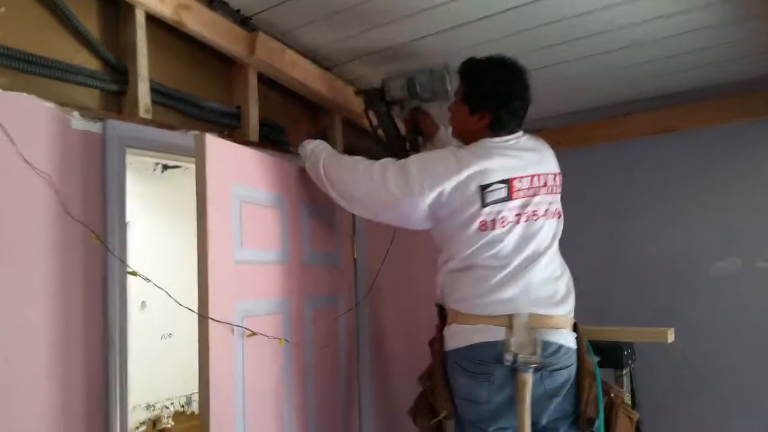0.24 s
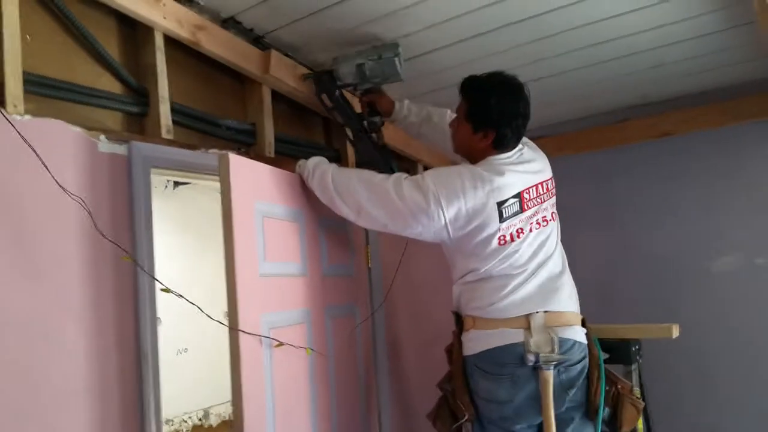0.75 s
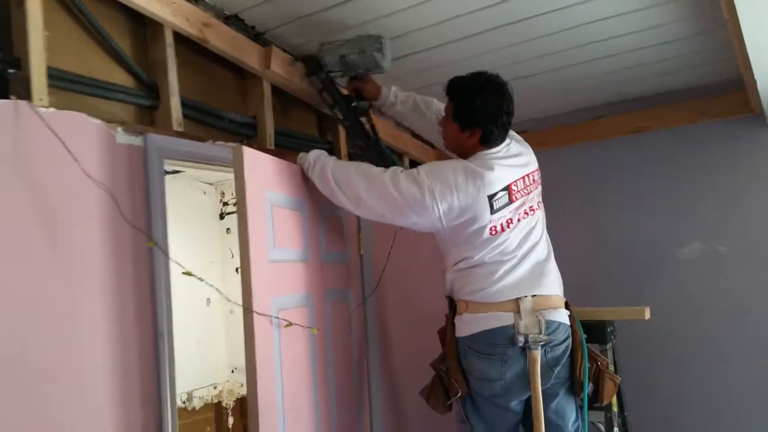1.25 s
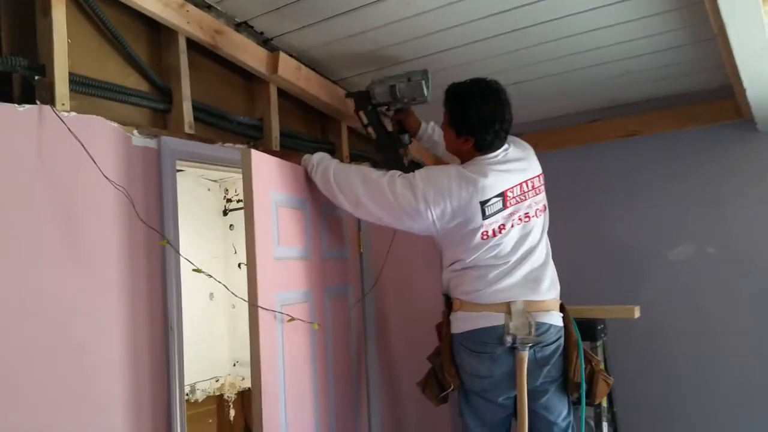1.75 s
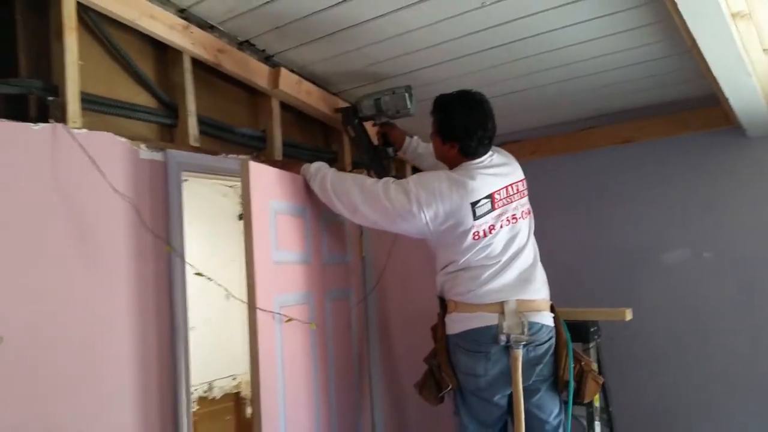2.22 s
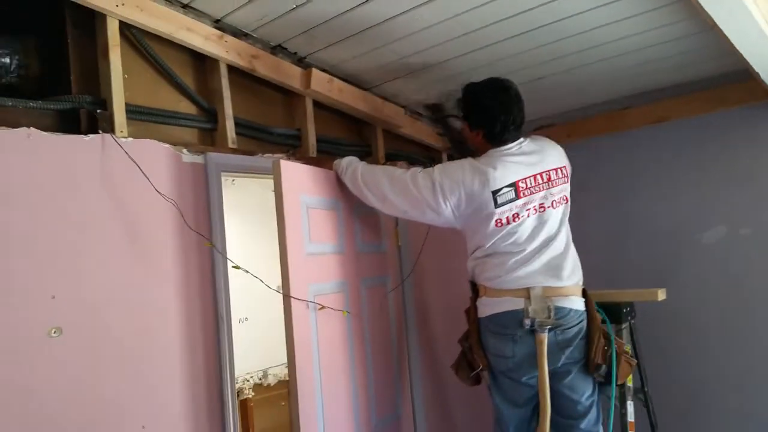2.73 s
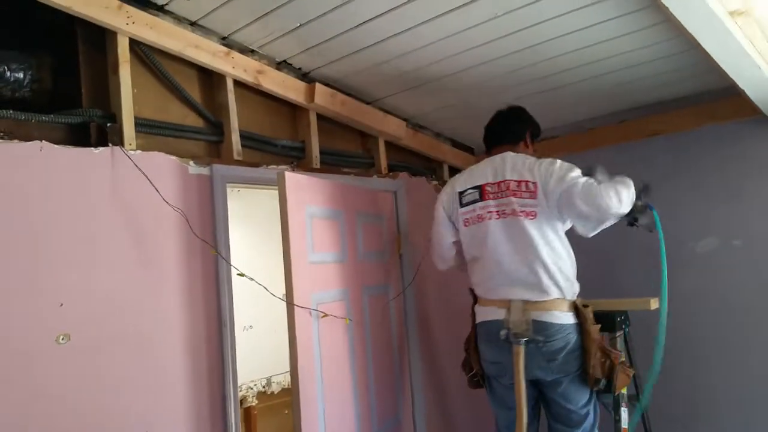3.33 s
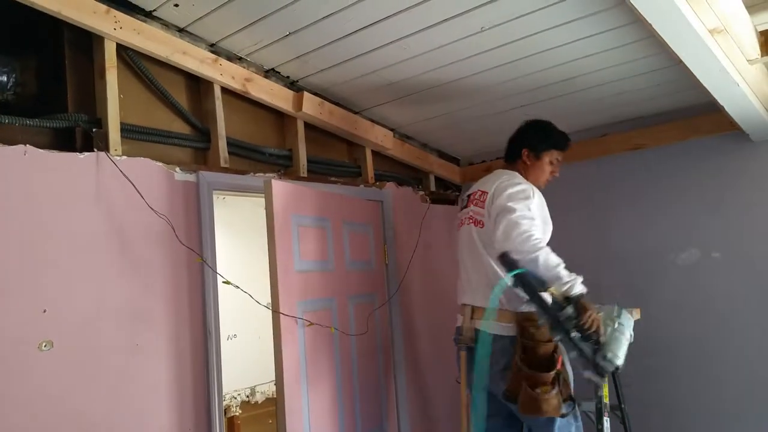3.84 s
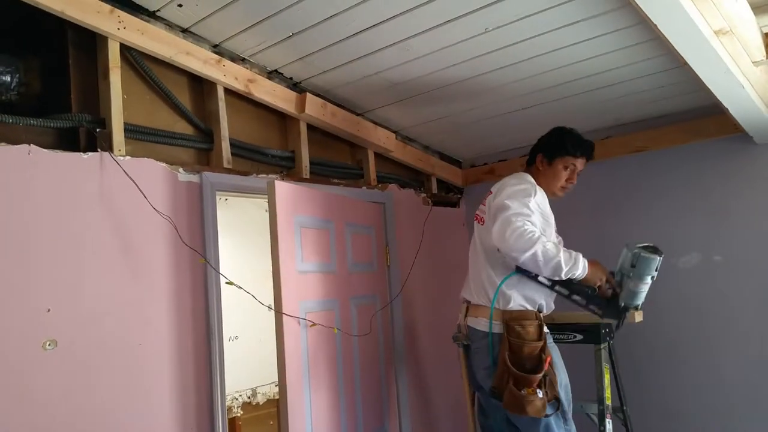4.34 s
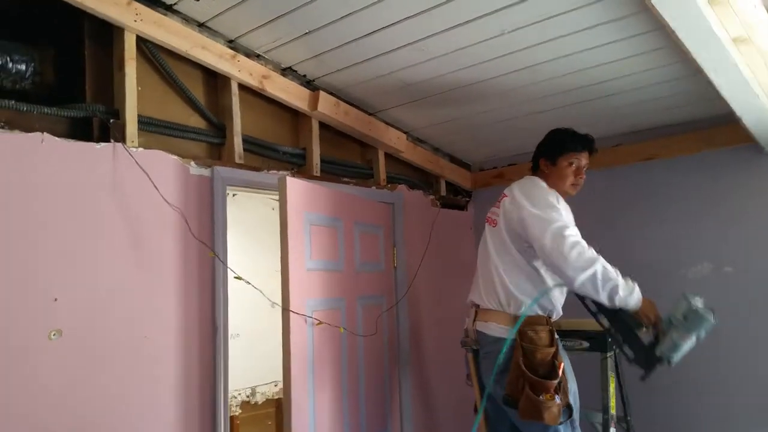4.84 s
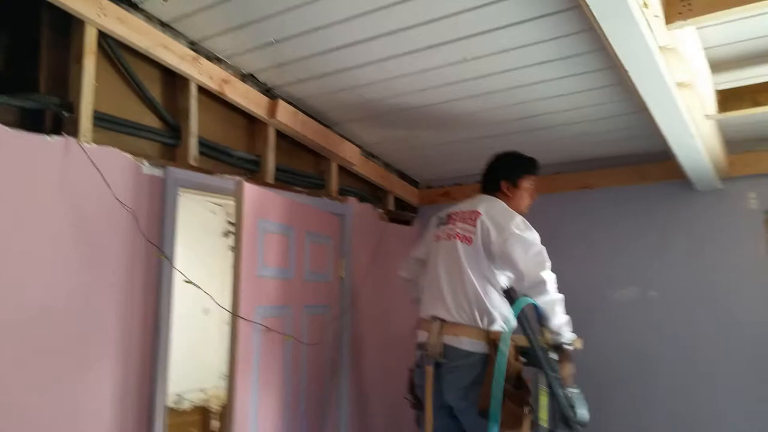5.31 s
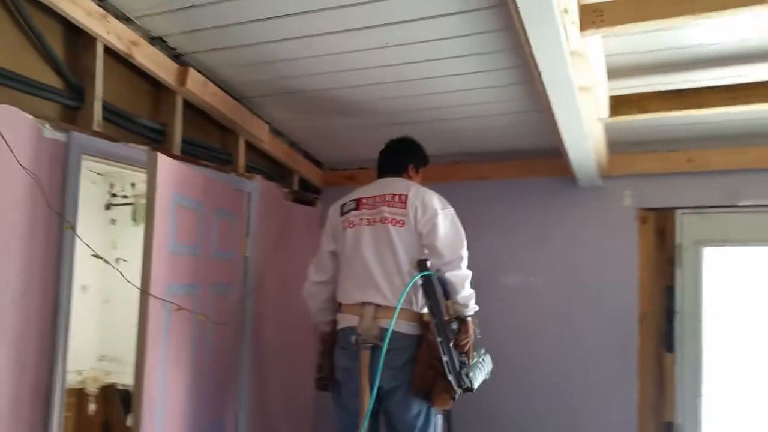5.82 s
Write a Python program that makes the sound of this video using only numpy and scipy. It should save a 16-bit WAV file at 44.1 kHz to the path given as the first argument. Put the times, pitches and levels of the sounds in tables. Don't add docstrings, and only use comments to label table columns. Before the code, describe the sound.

A small piston compressor drones in a bare room while a nail gun fires two sharp, blasting shots, followed by metallic clinks and knocks.

```python
import sys
import numpy as np
from scipy import signal
from scipy.fft import rfft, irfft
from scipy.io import wavfile
from scipy.ndimage import uniform_filter1d

SR = 44100
rng = np.random.default_rng(int(sys.argv[2]) if len(sys.argv) > 2 else 0)


def volts_from_db(level):
    exponent = np.asarray(level, float) / 20
    return 10 ** exponent


def generate_wav(sig):
    pcm = np.round(np.clip(np.atleast_2d(sig).T, -1, 1) * 32767).astype(np.int16)
    wavfile.write(sys.argv[1], SR, pcm)


N = 267687

# treble level/dB, hold/s, fall/(dB/s), bass relative level/dB
BLASTS = [
    (-16, 0.0041, 72, -2),
    (-19.5, 0.043, 75, -3),
    (-17, .006, 59, -13),
    (-19.5, .042, 91, -10.5),
]
# start t/s, cut off t/s
BLAST_SPANS = [
    (1.183, 1.344),
    (1.345, 1.8),
    (2.39, 2.548),
    (2.549, 2.97),
]
# f/Hz, level/(dB per Hz)
BLAST_SPECTRUM = [(18, -50), (30, -48), (49, -8), (152, 2.5), (257, -2), (401, -4.5), (836, -10),
                  (1410, -10), (1570, -10.5), (1840, -8.5), (3020, -14.5), (5660, -9), (8170, -14),
                  (11800, -14), (15700, -15)]
# f/Hz, side minus mid level/dB
BLAST_WIDTH = [(60, -3), (150, -6), (380, -5), (950, 0), (2380, -1), (5980, 0), (15000, 0)]
LIMIT_S = 0.17
TREBLE_DB_PER_S, LOW_DB_PER_S, MIDDLE_DB = 134, 23, -0.03

# t/s, level/dB, f/Hz, t60/s, left minus right level/dB
CLINKS = [(1.01, -39, 10700, 0.17, -8), (1.148, -12, 2520, 0.041, 11), (1.148, -21, 3460, 0.063, 14),
          (1.148, -19, 5500, 0.055, 0.), (2.356, -30, 3450, .08, 0.), (2.386, -1, 10400, 0.016, 0.),
          (2.446, -18.5, 1776, 0.13, -13), (3.949, -9, 3270, 0.092, -9), (3.98, -19.5, 3310, .18, 9),
          (4.064, -5, 820, .06, 3), (4.069, -18, 2580, .11, -2), (4.968, -14.5, 1736, .12, -10),
          (4.972, -15, 1990, 0.13, -2), (5.013, -23, 1890, 0.36, 1), (5.171, -45, 5920, .3, 0.),
          (5.21, -43, 1358, 1.7, 0.), (5.652, -40, 11600, .3, 9)]
# t/s, level/dB, f/Hz, t60/s, left minus right level/dB
THUDS = [
    (1.183, -24, 86.5, 0.13, 4),
    (1.599, -30, 140, 0.56, 4),
    (2.63, -45, 55.6, .55, -9),
    (2.7, -37, 132, 0.56, 0.),
]
# level/dB, f/Hz, t60/s, left minus right level/dB
SQUEAK = (-9.5, 1195, .085, 4)
SQUEAK_S, SLIP_S = 4.066, 0.022
GLIDE = 0.022

# t/s, level/dB, centre f/Hz, t60/s
TAPS = [(1.07, -28, 7960, 0.15), (1.146, -22.5, 4500, 0.12), (1.185, -10, 2180, 0.039),
        (1.346, -26, 3000, .09), (2.331, -37.5, 7500, .9), (2.354, -26.5, 3940, 0.14),
        (2.551, -10, 1290, .12), (3.899, -25, 3200, 0.11), (4.966, -18, 6940, 0.36),
        (4.968, -21, 10300, 0.081), (5.485, -27.5, 4870, 0.066), (5.651, -34, 6000, 0.13)]
# t/s, level/dB, centre f/Hz, t60/s
RUSTLES = [
    (.94, -39, 8000, 4.5),
    (3.09, -42, 5000, 0.37),
    (4.7, -32, 9000, .51),
    (4.74, -34, 8900, 0.33),
    (4.87, -32, 11000, 0.4),
    (4.909, -26, 8900, .2),
    (4.955, -24, 7500, 0.23),
    (5.084, -27.5, 8900, 0.16),
]
# t/s, level/dB, centre f/Hz, t60/s
RATTLES = [
    (1.187, -23.5, 5740, 1),
    (1.35, -30, 5600, 0.94),
    (4.863, -28.5, 5700, 1),
    (4.966, -15.5, 1980, 0.49),
    (4.97, -25, 5600, 0.74),
]
# width as a share of the centre frequency, rise/s
TAP, RUSTLE, RATTLE = (1.7, 0.0018), (1.14, 0.006), (0.24, 0.0048)

PUMP_HZ, STROKE_S = 43.87, 4.453
# multiple, level by the wall/dB, level in mid room/dB
LOW_HARMONICS = [(1, -34, -35), (2, -16, -24.5), (3, -13.5, -20), (4, -21.5, -26), (5, -3.5, -4),
                 (6, -14.5, -23.5), (7, -22, -10.5), (8, -8.5, -10), (9, -6.5, -11), (10, -30, -7),
                 (11, -23, -13.5), (12, -13.5, -6.5), (13, -0.5, -4.0), (14, 6, -17.5), (15, -0.5, 0),
                 (16, -25, -5), (17, 1.5, 2), (18, 9, -8), (19, -12.5, -2.0), (20, -8, -11)]
# multiple, level/dB
UPPER_HARMONICS = [(21, -15), (22, -12), (23, -10.5), (24, -8.5), (25, -14), (26, -16.5), (27, -21),
                   (28, -10), (30, -7.5), (31, -12.5), (33, -12.5), (36, -21), (37, -21), (38, -20),
                   (39, -15.5), (40, -14), (41, -12), (42, -29), (43, -26.5), (44, -15), (45, -17),
                   (46, -18), (47, -12), (48, -15.5), (49, -10), (50, -8.5), (51, -22), (53, -13.5),
                   (54, -8.5), (56, -20),
                   (69, -20.5), (71, -27), (88, -27), (93, -23), (95, -23), (100, -27), (101, -37), (102, -20.5),
         (103, -22.5), (104, -29), (109, -21.5)]
# f/Hz, level/(dB per Hz)
AIR_SPECTRUM = [(18, -61), (30, -38), (165, -10), (214, -8), (264, -4.5), (482, -5), (660, 5), (793, -3),
                (929, -4.5), (2200, -2.5), (3270, -18), (4590, -20), (6290, -23), (12100, -35),
                (15700, -32)]
# f/Hz, width/Hz, level/dB
CASING = [(2300, 610, -10), (4730, 1040, -22), (9630, 380, -30.5), (11920, 1030, -30)]
# f/Hz, side minus mid level/dB
ROOM_WIDTH = [(60, 1), (150, -14), (380, -6), (950, 5.5), (2380, 0), (5980, 1), (15000, 0)]
# t/s, share of a stroke
SMEAR = [(.4, .8), (3.4, .7), (3.8, .1), (4.9, .16), (5.15, .8), (5.75, .8), (5.95, .3)]
# t/s, spread/s, low f/Hz, high f/Hz, depth 0-1
DEAD_SPOTS = [
    (2.1, 0.17, 250, 470, 0.94),
    (2.02, 0.33, 500, 790, 0.48),
    (6.1, 0.59, 1220, 2000, 0.37),
    (2.3, 0.52, 130, 190, .3),
    (2.12, 0.18, 2100, 2900, 0.18),
]
# t/s, 0 by the wall to 1 in mid room
PLACE = [(.5, 0.026), (1.1, 0.52), (1.8, 0.57), (2.3, 1), (3.1, 0.72), (3.7, 0.76), (4.6, 0.85),
         (5.2, 0.84), (5.6, 0.56), (6., 0.21)]
CORNER_DB, LEAVE_DB_PER_S, CORNER_HZ = 4.5, 1.1, 370
LEAVE_S, LEAVE_SPREAD_S = 2.15, 0.36
CLATTER_DB, HISS_DB = (1.5, 2), (1.8, 4)
# t/s, level/dB
GAIN = [(.352, -56), (.378, -28.5), (1.15, -22.5), (1.18, -37.5), (1.7, -38.5), (2.36, -36), (2.385, -36),
        (2.9, -38), (3.42, -38), (3.88, -23), (4.92, -21.5), (4.975, -30.5), (5.056, -23.5), (5.674, -28),
        (6.07, -21.5)]
FADE_START_S, FADE_S, FADE_POWER = 0.31, 0.74, 1.35

# f/Hz, left minus right level/dB
PORTS = [(60, 9.5), (150, -4), (380, 2), (950, -1), (2380, -1.5), (5980, -1), (15000, -2.5)]
EDGE_HZ = 15880


def evened(x):
    return x / np.sqrt(np.mean(abs(x) ** 2) + 1e-20)


def read(points, hz):
    f, value = np.transpose(points)
    return np.interp(np.log(hz + 1), np.log(f + 1), value)


def add(mix, s, sound):
    part = mix[:, round(s * SR):][:, :sound.shape[1]]
    part += sound[:, :part.shape[1]]


def stereo(mid, side):
    return np.array([mid + side, mid - side])


def noise(count, colour, width):
    hz = np.fft.rfftfreq(count, 1 / SR)
    mid, side = rfft(rng.standard_normal((2, count))) * volts_from_db(colour(hz))
    return irfft(stereo(mid, side * volts_from_db(read(width, hz))), count)


def lumps(count, size):
    return evened(uniform_filter1d(rng.standard_normal(count), size=size))


def band(x, lo_hz, hi_hz):
    hz = np.fft.rfftfreq(x.shape[-1], 1 / SR) + 1e-3
    gain = 1 / np.sqrt((1 + (lo_hz / hz) ** 8) * (1 + (hz / hi_hz) ** 8))
    return irfft(rfft(x) * gain, x.shape[-1])


def drift(count, per_s):
    steps = N * 100 // SR + 2
    z = rng.standard_normal((count, steps)) + 1j * rng.standard_normal((count, steps))
    slow = np.exp(-(np.fft.fftfreq(steps, 1 / 100) / per_s) ** 2)
    return evened(np.fft.ifft(np.fft.fft(z) * slow))


def blast(db, hold, fall_db, bass_db, start, stop):
    t = np.arange(start, stop, 1 / SR)
    since = t - start
    late = np.maximum(since - LIMIT_S, 0)
    level_db = db - fall_db * np.maximum(since - hold, 0)
    lumps_db = 1.6 * lumps(SR // 2 + 1, 160)
    x = noise(len(t), lambda hz: read(BLAST_SPECTRUM, hz) + lumps_db[hz.astype(int)], BLAST_WIDTH)
    bands = [band(x, lo, hi) for lo, hi in ((3000, 20000), (500, 3000), (30, 500))]
    treble, middle, bass = (b / np.std(b.mean(0)) for b in bands)
    echoes = volts_from_db(0.31 * lumps(len(t), 150) + 0.86 * lumps(len(t), 500))
    edges = np.clip(since / 0.0012, 0, 1) * np.clip((stop - t) / 0.0013, 0, 1)
    bass_gain = volts_from_db(bass_db - 1.0 + 17.0 * np.minimum(since, LIMIT_S)) * np.clip(since / 0.0051, 0, 1)
    lows = volts_from_db(MIDDLE_DB) * middle + bass_gain * bass
    sound = volts_from_db(-TREBLE_DB_PER_S * late) * treble + volts_from_db(-LOW_DB_PER_S * late) * lows
    return start, sound * volts_from_db(level_db) * echoes * edges


def clink(s, db, hz, t60, pan_db):
    t = np.arange(round(.6 * SR)) / SR
    turns = np.cumsum(hz * (1 + GLIDE * np.exp(-t / 0.014))) / SR
    ring = volts_from_db(db - 60 * t / t60) * np.sin(2 * np.pi * turns) * np.clip(t / .008, 0, 1)
    walls = np.zeros((2, 5000))
    at = rng.integers(150, 5000, (2, 24))
    echoes = 0.13 * rng.choice([-1, 1], at.shape) * volts_from_db(-60 * at / SR / .5)
    np.put_along_axis(walls, at, echoes, 1)
    walls[:, 0] = 1
    return s, signal.fftconvolve(ring[None], walls, axes=1) * volts_from_db([[pan_db / 2], [-pan_db / 2]])


def knock(s, db, hz, t60, width, rise):
    t = np.arange(round(.4 * SR)) / SR
    x = noise(len(t), lambda f: -10 * np.log10(1 + (2 * (f - hz) / (width * hz)) ** 4), ROOM_WIDTH)
    grain = volts_from_db(2.2 * lumps(len(t), 120))
    return s, evened(band(x, 412, 20000)) * grain * volts_from_db(db - 60 * t / t60) * np.clip(t / rise, 0, 1)


def pump_tones(turns, wander=0.32, per_s=0.88):
    fixed_tones = [(m, db, db) for m, db in UPPER_HARMONICS]
    k, wall_db, room_db = np.transpose(LOW_HARMONICS + fixed_tones)
    lag = rng.uniform(-np.pi, np.pi, len(k)) * np.clip(abs(k - 16) / 3 - 1, 1 / 8, 1)
    speeds = per_s * (1 + k[:, None] / 36.0)
    depth = wander * np.clip(k / 20., 0, 1.8)[:, None]
    mids = (1 + depth * drift(len(k), speeds)) * np.exp(1j * lag)[:, None]
    mids *= 1 + 0.078 * drift(len(k), 26.0)
    sides = drift(len(k), speeds) * volts_from_db(read(ROOM_WIDTH, k * PUMP_HZ) - 4.0)[:, None]
    at, out = np.arange(N) * 100 / SR, np.zeros((2, N))
    steps = np.arange(mids.shape[1])
    smear, place = (np.interp(steps / 100, *np.transpose(c)) for c in (SMEAR, PLACE))
    for order, a_db, b_db, mid, side in zip(k, wall_db, room_db, mids, sides):
        pair = stereo(mid, side) * volts_from_db(a_db + (b_db - a_db) * place)
        pair = pair * np.exp(-1j * np.pi * smear * (np.clip(order, 11, 21) - 17) ** 2 / 8)
        spin = np.exp(2j * np.pi * order * turns)
        out += [(spin * np.interp(at, steps, c)).real for c in pair]
    return out


def rush(turns, puff=0.023):
    def colour(hz):
        peaks = sum(volts_from_db(db) / (1 + (2 * (hz - f) / w) ** 2) for f, w, db in CASING)
        return 20 * np.log10(volts_from_db(read(AIR_SPECTRUM, hz)) + peaks)
    return noise(N, colour, ROOM_WIDTH) * (1 + puff * np.cos(2 * np.pi * turns))


def compressor():
    t = np.arange(N) / SR
    place = np.interp(t, *np.transpose(PLACE))
    clatter_db, hiss_db = (a + (b - a) * place for a, b in (CLATTER_DB, HISS_DB))
    turns = PUMP_HZ * (t - STROKE_S)
    x = evened(pump_tones(turns)) + volts_from_db(-2.5) * evened(rush(turns))
    x /= np.std(band(x.mean(0), 500, 900))
    for at, spread, lo_hz, hi_hz, depth in DEAD_SPOTS:
        x -= depth * np.exp(-((t - at) / spread) ** 2) * band(x, lo_hz, hi_hz)
    bass, low, high = band(x, 1, CORNER_HZ), band(x, 1, 1000), band(x, 1, 3000)
    corner_db = CORNER_DB / (1 + np.exp((t - LEAVE_S) / LEAVE_SPREAD_S))
    parts = volts_from_db(6.5 - LEAVE_DB_PER_S * t + corner_db) * bass + low - bass
    parts += volts_from_db(clatter_db) * (high - low) + volts_from_db(hiss_db) * (x - high)
    fade = np.clip((t - FADE_START_S) / FADE_S, 0, 1) ** FADE_POWER
    return parts * volts_from_db(np.interp(t, *np.transpose(GAIN))) * fade


def scene():
    mix = compressor()
    for row, span in zip(BLASTS, BLAST_SPANS):
        add(mix, *blast(*row, *span))
    for rows, kind in ((TAPS, TAP), (RUSTLES, RUSTLE), (RATTLES, RATTLE)):
        for row in rows:
            add(mix, *knock(*row, *kind))
    slips = [(SQUEAK_S + SLIP_S * n, *SQUEAK) for n in range(4)]
    for row in CLINKS + THUDS + slips:
        add(mix, *clink(*row))
    return mix


def top_cut(x):
    return signal.sosfilt(signal.butter(12, 15880, fs=SR, output="sos"), x)


def record(dry):
    tilt_db = read(PORTS, np.fft.rfftfreq(N + SR, 1 / SR)) * np.array([[.5], [-.5]])
    ports = irfft(rfft(dry, N + SR) * volts_from_db(tilt_db), N + SR)[:, :N]
    low_pass = signal.firwin(511, EDGE_HZ, window=("kaiser", 9), fs=SR)
    limited = signal.oaconvolve(ports, low_pass[None], "same")
    return top_cut(np.clip(limited, -1, 1))


dry = scene()
out = record(dry)
generate_wav(out)
```